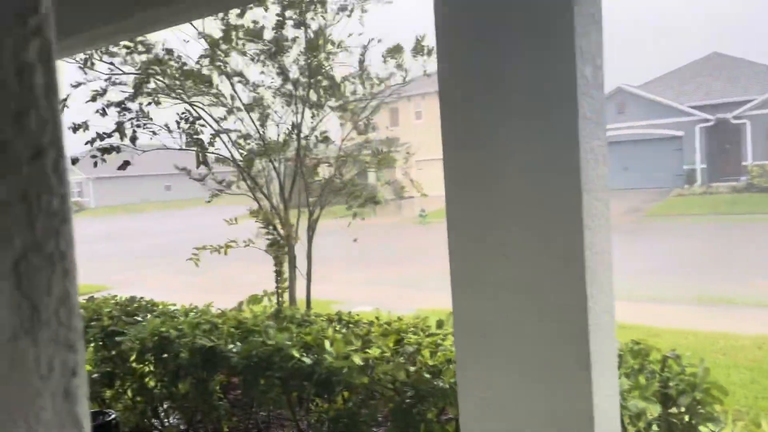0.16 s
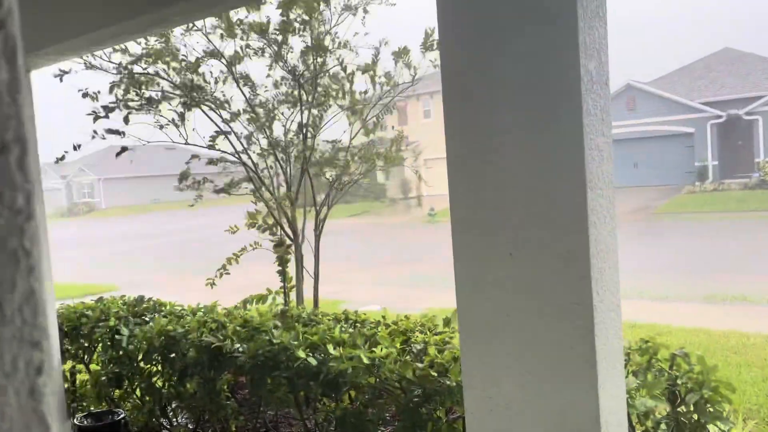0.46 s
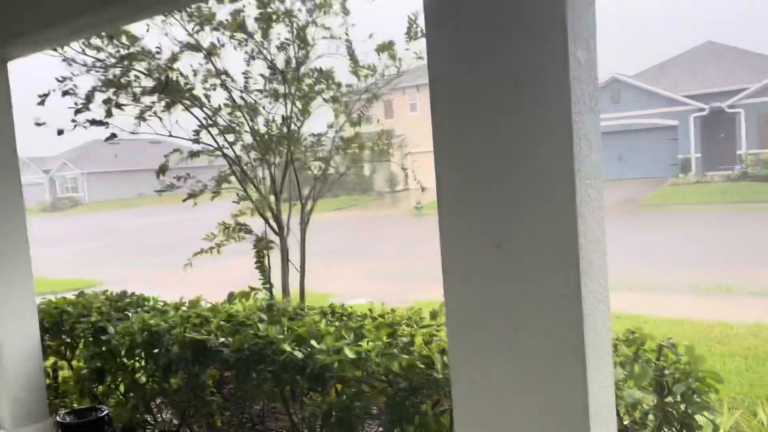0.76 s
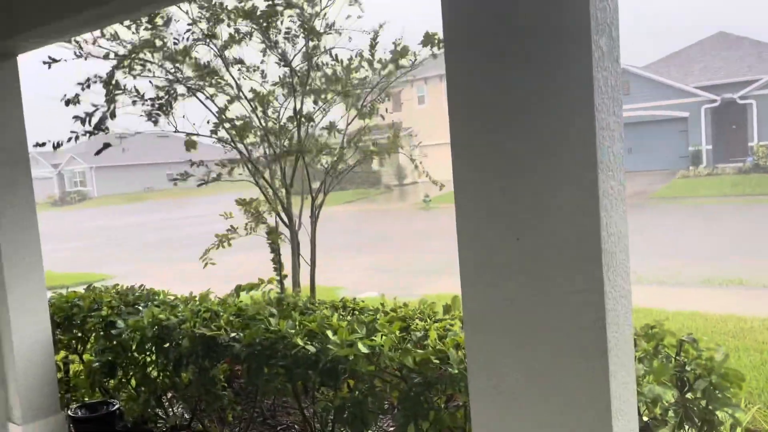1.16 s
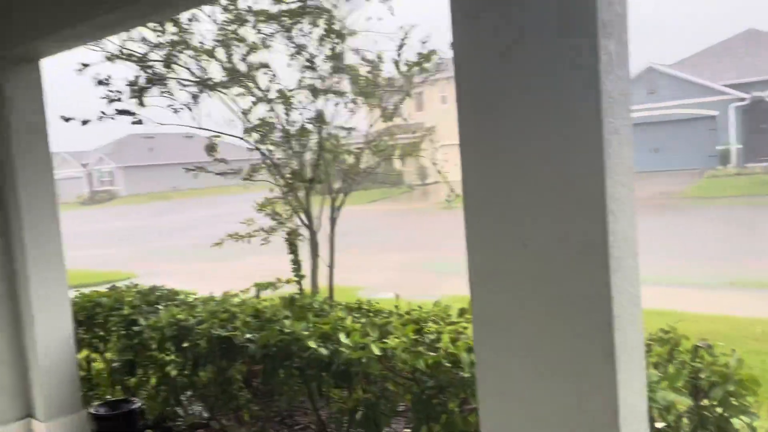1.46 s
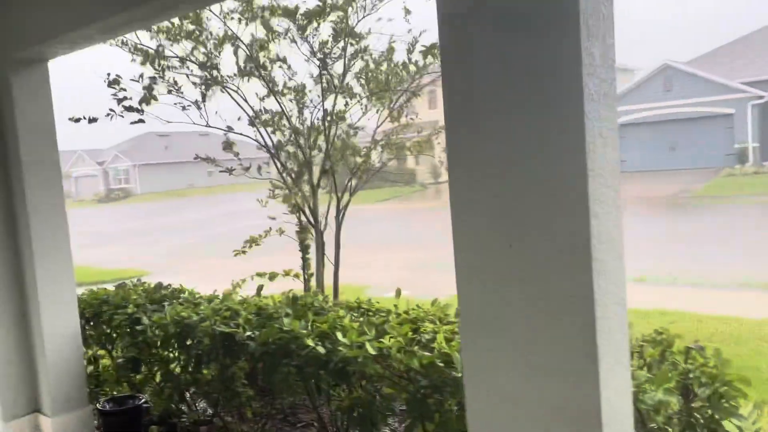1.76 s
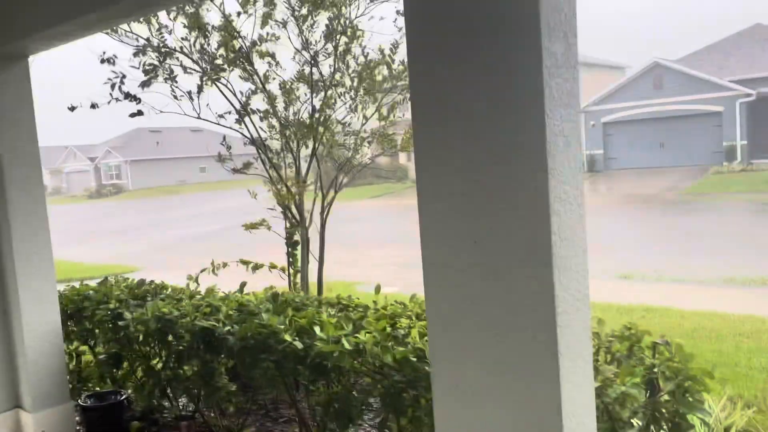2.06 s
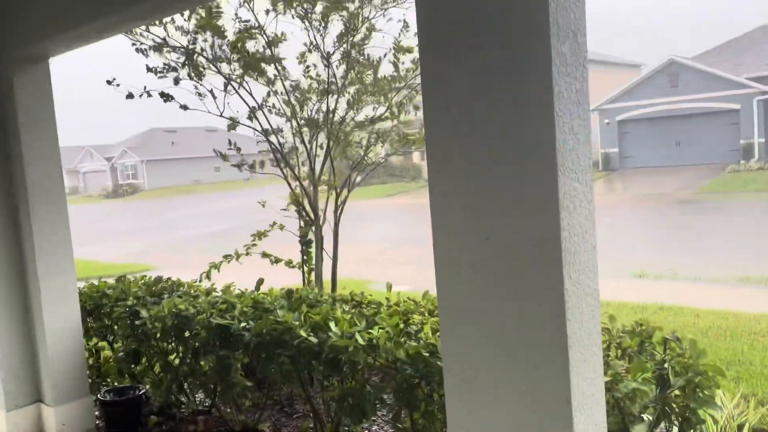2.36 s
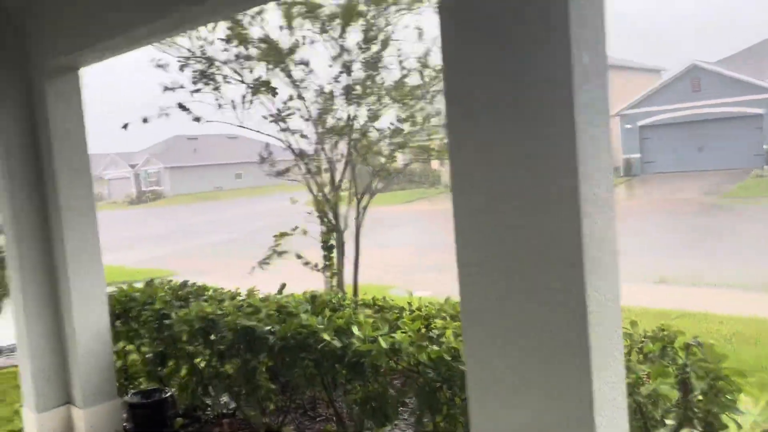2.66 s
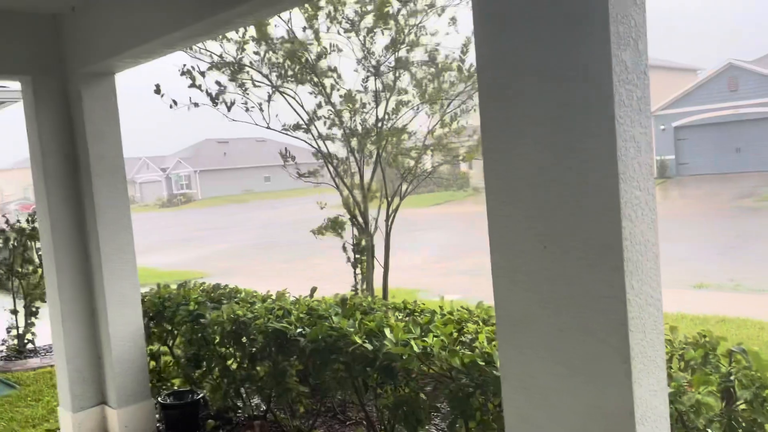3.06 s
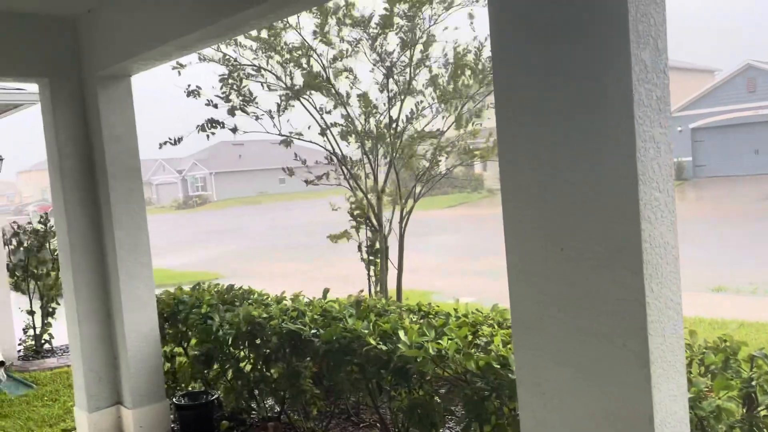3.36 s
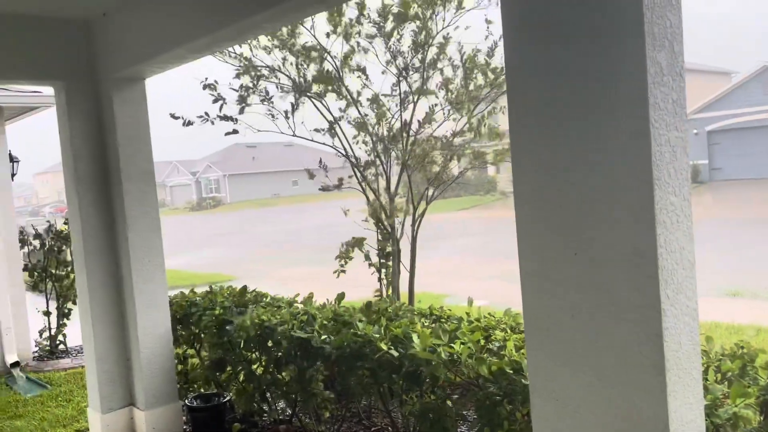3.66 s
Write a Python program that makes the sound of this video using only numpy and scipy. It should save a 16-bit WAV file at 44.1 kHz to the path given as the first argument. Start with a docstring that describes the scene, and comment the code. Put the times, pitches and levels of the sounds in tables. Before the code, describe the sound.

Heavy rain hisses steadily outside a porch while wind thumps the microphone and water splashes nearby.

```python
"""Storm from a covered porch

Heavy rain hisses on road, roofs and hedge (filtered noise with a patter of drops), and wind roars in the
trees (lower filtered noise). Lumps of run-off water splash on the paving and echo off a wall (noise bursts),
and heavy drops tick on something hard (short ringing modes). Turbulent air rumbles on the microphone ports,
and single eddies thump them (brief pressure swings of falling pitch).
"""
import sys
import numpy as np
from scipy import signal
from scipy.fft import rfft, irfft, next_fast_len
from scipy.io import wavfile
from scipy.ndimage import uniform_filter1d, map_coordinates

SR = 44100
rng = np.random.default_rng(int(sys.argv[2]) if len(sys.argv) > 2 else 0)


def bounce(signal):
    """Save signal as a 16-bit WAV file at the path given by the first command-line argument."""
    frames = np.transpose(np.atleast_2d(signal))
    limited = np.clip(frames, -1, 1)
    pcm = np.round(limited * 32767).astype(np.int16)
    wavfile.write(sys.argv[1], SR, pcm)


N = 167580

# Course of the rain hiss, of the wind roar and of the port rumble: t/s, level/dB
RAIN_LEVEL = [(0.0, -40), (0.66, -41), (1.0, -41.5), (1.39, -42), (1.87, -40.5), (2.5, -41.5), (3.23, -43),
              (3.6, -41.5), (3.8, -41.5)]
ROAR_LEVEL = [(0.0, -40.5), (0.17, -49), (0.68, -52.5), (1.05, -52), (1.15, -47), (1.43, -46.5),
              (1.65, -46), (1.82, -42.5), (2.1, -43), (2.56, -43), (2.77, -41), (3.15, -44.5), (3.42, -43),
              (3.65, -44), (3.8, -41.5)]
RUMBLE_LEVEL = [(0,-32),(.15,-38.5),(.24,-50.5),(.32,-28),(.55,-48.5),(.66,-46.5),(.78,-42.5),(.97,-51.5),(1.2,-45.5),(1.5,-48),(1.7,-43),(2.0,-50),(2.2,-45),(2.42,-39.5),(2.65,-44.5),(2.9,-35.5),(3.05,-42.5),(3.15,-43.5),(3.3,-49.5),(3.5,-44.5),(3.65,-43),(3.8,-41)]

# Relative spectra of the part alike at both ports (MID) and the part opposed (SIDE): f/Hz, level/dB per Hz
RAIN_MID = [(300, -42), (600, -3.5), (750, 2.5), (1200, 2), (2500, 1), (4500, -2.5), (5500, -5),
            (6500, -3.5), (7500, -9.5), (8200, -26), (8700, -82), (9100, -88), (9550, -16.5), (9900, -8.5),
            (12800, -4), (14300, -8.5), (15600, -22)]
RAIN_SIDE = [(300, -24), (600, -7), (750, 1.5), (1200, 0), (2100, 0), (2600, -0.5), (4500, -5), (5200, -5),
             (6600, -7), (9000, -1.5), (12300, -9.5), (13000, -57), (13500, -90)]
ROAR_MID = [(100, -5), (200, 1), (320, 4), (500, -0.5), (900, -6), (2000, -22.5), (4000, -75)]
ROAR_SIDE = [(100, -20), (200, -8), (320, -5.5), (600, -4), (900, -8), (2000, -10), (4000, -53)]
RUMBLE_MID = [(20, -49), (40, -7), (75, 1.5), (120, -6), (200, -16), (400, -37), (800, -84)]

# Run-off lumps: t/s, nominal level/dB, burst centre f/Hz, burst width/octaves, burst t60/s,
# low slosh level/dB and spray level/dB relative to the burst
SPLASHES = [(.436,-38,1500,0.76,0.21,-10,-10),(1.025,-28.5,1520,0.86,0.14,-9,-15),(1.053,-30.5,1310,1,0.095,-16,-12),(1.349,-48,2200,.4,0.11,-12,-13),(1.607,-31.5,1290,0.7,0.18,-4.5,-29),(1.888,-30,2180,0.58,0.078,-33,-8),(2.166,-25.5,1400,0.75,0.11,-5.5,-19),(2.408,-37.5,1960,0.93,0.38,-11,-7),(2.589,-39,1900,0.39,0.074,-4,-24),(2.614,-38,1080,0.6,0.51,-2,-33),(2.815,-39,1800,0.5,0.15,-11,-25),(2.84,-31,2200,0.5,0.13,-6.5,-20),(3.107,-33.5,1480,0.95,0.24,-1.1,-15),(3.68,-37.5,2120,0.36,0.15,-13,-21)]

# Heavy drops on something hard: t/s, level of each mode/dB, nominal f/Hz, t60/s
TICKS = [(.4305, -23, 2960, 0.013), (.68, -35, 12500, .003), (1.028, -30.5, 2120, .05),
         (1.055, -27, 1700, 0.014), (1.127, -27, 12700, 0.005), (1.864, -37, 12500, 0.0034),
         (1.892, -28.5, 2217, 0.06), (2.166, -26, 1217, 0.042), (2.188, -27, 1140, .04),
         (2.843, -34, 1930, 0.036), (2.856, -33, 1580, .04), (3.677, -34, 2190, 0.031)]
# Mode frequencies of a struck object: ratio to the nominal f
TICK_MODES = (.9, 1.0, 1.11)

# Eddies at the ports: t/s, nominal peak level/dB, nominal f/Hz, nominal length/cycles,
# sharp edge level/dB relative to the swing
EDDIES = [(0.016,-5.5,332,0.98,-28),(.022,-13.5,170,1.1,-16),(.038,-20,194,2.2,-6.5),(.055,-15.5,218,2.1,-20),(0.068,-22,304,3.2,-20),(0.08,-29,150,0.96,-7),(0.096,-27,120,1.1,-14),(.116,-19,326,1.7,-20),(0.129,-26,108,1.1,-15),(0.142,-26,109,0.79,-19),(0.3,-33,98,2.9,-18),(.330,-11.5,180,1.28,0),(.342,-21.5,110,1.0,-12),(.382,-31,112,1.2,1.5),(.407,-17.5,232,0.7,-7.5),(.417,-29,223,2.2,-6),(.423,-26.5,497,1.9,-6),(0.44,-32,120,1.1,-5),(.496,-30,160,0.36,-7),(0.878,-30,116,2.1,-9),(1.176,-34,100,1.4,-7),(1.222,-32.5,175,1.2,-5.5),(1.26,-33,129,1.6,-1),(1.365,-35,128,0.83,-3),(1.41,-33.5,109,0.79,-14),(1.679,-37,147,1.3,-13),(2.106,-32,171,1.1,-17),(2.279,-33,167,0.95,-13),(2.3,-26,120,1.7,-21),(2.37,-26,130,1.2,-31),(2.395,-24.5,126,0.67,-27),(2.452,-31.5,118,2.6,-10),(2.478,-24,147,1,-11),(2.569,-29,105,0.78,-15),(2.716,-24.5,139,0.83,-12),(2.75,-21,180,0.8,-19),(2.762,-30,90,1.3,-22),(2.844,-28,150,0.64,-2),(2.903,-41,129,0.42,-10),(2.923,-33.5,113,1.5,-1),(2.946,-29.5,118,0.89,-12),(3.678,-39,123,5,-11)]

# Balance between the ports: f/Hz, left over right level/dB
BALANCE = [(150, 0.2), (330, 1), (800, 1.9), (1800, 0), (2800, 0.2), (4500, 2.5), (6500, 2.7), (7800, -4)]

DROPS_DB, DROP_SPREAD_DB = -11.5, 1  # near drops against the hiss; mean of their exponential size spread
RUMBLE_SIDE_DB, LUMP_DB = -13, 1.5  # opposed part of the rumble; depth factor of its lumps

SPLASH_RISE_S, ECHO_S, ECHO_DB, GRAIN_DB = .002, .027, -8, 2.2
SLOSH_HZ, SLOSH_RISE_S, SLOSH_T60_S = 312, 0.016, 0.38
TAIL_RATIO, TAIL_DB, TAIL_LONGER = 0.65, -5, 2.67  # tail pitch, level and decay time against the burst

SAG, EDGE_RATIO = 0.42, 2.74  # fall of eddy pitch; edge over swing pitch, and snap over edge pitch
SNAP_DB, EDDY_SIDE_DB = -9.5, -12.5  # snap under the edge, before the edge level counts again; opposed part
RAG_DB, RAG_HZ, RAG_S = -14.5, 474, 0.012  # ragged noise: level under the edge, centre, half length

TICK_PHASE_SPREAD, EDDY_PHASE_SPREAD = .3, .3  # share of a half turn by which the parts start apart
LOW_CUT_HZ, TOP_HZ = 34, 15700


def amp(db):
    """Logarithmic level: decibels become an amplitude ratio."""
    return 10 ** (np.asarray(db) / 20)


def unit(x):
    """Normalisation: scale a signal to an rms of 1."""
    return x / np.sqrt(np.mean(x ** 2) + 1e-20)


def along(points, hz):
    """Spectral interpolation: read a table of values along a logarithmic frequency axis."""
    f, value = np.transpose(points)
    return np.interp(np.log(hz + 1), np.log(f + 1), value)


def curve(rows):
    """Linear interpolation in time: one table value per sample."""
    s, value = np.transpose(rows)
    return np.interp(np.arange(N) / SR, s, value)


def wobble(rate):
    """Band-limited fluctuation: a smooth random curve, rate knots a second, without slow drift."""
    knots = rng.standard_normal(400)
    fast_knots = knots - uniform_filter1d(knots, size=5)
    return map_coordinates(fast_knots, [np.arange(N) * rate / SR])


def filtered(x, response):
    """Linear filtering: multiply the spectrum by a response of frequency."""
    m = next_fast_len(x.shape[-1] + 8192)
    spectrum = rfft(x, m) * response(np.fft.rfftfreq(m, 1 / SR))
    return irfft(spectrum, m)[..., :x.shape[-1]]


def patchy(patchy_db):
    """Modulated noise: two white noises share random patches of gain in time and frequency."""
    noises = signal.stft(rng.standard_normal((2, N)), nperseg=512)[2]
    field = rng.standard_normal(noises.shape[1:])
    field = uniform_filter1d(field, size=4, axis=0)
    field = uniform_filter1d(field, size=5, axis=1)
    field = field - uniform_filter1d(field, size=40, axis=1)  # no slow drift
    return signal.istft(noises * amp(patchy_db * unit(field)), nperseg=512)[1][:, :N]


def stereo(pair, mid_db, side_db):
    """Sum and difference: colour the alike and the opposed part; the alike part has rms 1."""
    mid, side = filtered(pair, lambda hz: amp([along(mid_db, hz), along(side_db, hz)]))
    return np.array([mid + side, mid - side]) / np.sqrt(np.mean(mid ** 2))


def rain():
    """Superposition of many impacts: far rain merges into noise, nearer drops patter as brief clicks on it."""
    count = 3000
    at = rng.integers(0, N, count)
    size = amp(DROP_SPREAD_DB * rng.exponential(size=count)) * rng.standard_normal((2, count))
    impulses = np.array([np.bincount(at, s, N) for s in size])
    t = np.arange(90) / SR
    click = rng.standard_normal(90) * amp(-60 * t / 0.00036)  # t60 of 0.36 ms
    drops = signal.fftconvolve(impulses, [click], axes=1)[:, :N]
    pair = patchy(patchy_db=1.85) + amp(DROPS_DB) * unit(drops)
    level_db = curve(RAIN_LEVEL) + .5 * wobble(18) + 0.76 * wobble(29.76)
    return amp(level_db) * stereo(pair, RAIN_MID, RAIN_SIDE)


def roar():
    """Aerodynamic noise: wind in trees and round the pillars gives a low, fluctuating broadband roar."""
    level_db = curve(ROAR_LEVEL) + 0.21 * wobble(7.77) + 0.85 * wobble(20)
    return amp(level_db) * stereo(patchy(patchy_db=1.35), ROAR_MID, ROAR_SIDE)


def buffet():
    """Turbulent pressure noise: air moving on the ports rumbles in lumps, mostly alike at both ports."""
    side_db = [(hz, db + RUMBLE_SIDE_DB) for hz, db in RUMBLE_MID]
    lumps = unit(amp(LUMP_DB * wobble(28.02)))
    rumble = stereo(rng.standard_normal((2, N)), RUMBLE_MID, side_db)
    return amp(curve(RUMBLE_LEVEL)) * lumps * rumble


def fall(t, rise, t60):
    """Exponential decay: an envelope that starts at t = 0 with a rise constant and falls 60 dB in t60."""
    since = np.abs(t)
    return (t > 0) * (1 - np.exp(-since / rise)) * amp(-60 * since / t60)


def splashes():
    """Impact of water: a grainy burst with spray, its wall echo, a duller tail and a low slosh."""
    length = 16000
    out, t = np.zeros((2, N + length)), np.arange(length) / SR

    def band(hz, octaves):
        """Band-pass noise: a Gaussian response on the octave axis, independent at the two ports."""
        noise = rng.standard_normal((2, length))
        return unit(filtered(noise, lambda f: np.exp(-.5 * (np.log2((f + 1) / hz) / octaves) ** 2)))

    for s, db, hz, octaves, t60, slosh_db, spray_db in SPLASHES:
        grain = amp(GRAIN_DB * np.interp(t * 400, np.arange(160), rng.standard_normal(160)))
        direct = fall(t, SPLASH_RISE_S, t60)
        echo = amp(ECHO_DB) * fall(t - ECHO_S, SPLASH_RISE_S, t60)
        shape = grain * np.hypot(direct, echo)  # the powers of direct sound and echo add
        burst = shape * (band(hz, octaves) + amp(spray_db) * band(5600, 0.35))
        tail_shape = fall(t, SLOSH_RISE_S / 2, TAIL_LONGER * t60)
        tail = amp(TAIL_DB) * tail_shape * band(TAIL_RATIO * hz, 0.64 * octaves)
        alike, opposed = band(SLOSH_HZ, 0.58)
        low = alike + 0.51 * opposed * [[1], [-1]]
        slosh = amp(slosh_db) * fall(t, SLOSH_RISE_S, SLOSH_T60_S) * low
        start = round(s * SR)
        out[:, start:start + length] += amp(db) * (burst + tail + slosh)
    return out[:, :N]


def ticks():
    """Modal ringing: single heavy drops strike something hard close by, and three damped modes sound."""
    out = np.zeros((2, N))
    phases = TICK_PHASE_SPREAD * rng.uniform(-np.pi, np.pi, (len(TICKS), 3, 2, 1))
    for (s, db, hz, t60), phase in zip(TICKS, phases):
        t = np.clip(np.arange(N) / SR - s, 0, None)
        ring = sum(np.sin(2 * np.pi * k * hz * t + p) for k, p in zip(TICK_MODES, phase))
        rise = 1 - np.exp(-t / (0.054 * t60))
        out += amp(db - 60 * t / t60) * rise * ring
    return out


def eddies():
    """Transient pressure: each eddy swings with falling pitch, with an edge, snap and ragged noise at its peak."""
    half = 2000
    length = 2 * half
    out, t = np.zeros((2, N + length)), np.arange(-half, half) / SR
    noise = rng.standard_normal(N + length)
    noise = unit(filtered(noise, lambda f: np.exp(-(np.log2((f + 1) / RAG_HZ) / 0.7) ** 2)))
    draws = rng.uniform(-np.pi, np.pi, (len(EDDIES), 4))
    for (s, db, hz, cycles, edge_db), draw in zip(EDDIES, draws):
        u = t * hz / cycles  # time in eddy lengths

        def swing(k, phase):
            """Gaussian wave packet: k times the nominal pitch, sagging through its peak."""
            turns = k * hz * t * (1 - SAG * np.tanh(u))
            return np.exp(-2.2 * (k * u) ** 2) * np.cos(2 * np.pi * turns + phase)

        def edge(phase):
            """Steepening: a sharper packet and a sharper snap, which grows faster with edge level."""
            snap = amp(SNAP_DB + edge_db) * swing(EDGE_RATIO ** 2, phase)
            return amp(edge_db) * (swing(EDGE_RATIO, phase) + snap)

        start = round(s * SR)
        rag = amp(RAG_DB + edge_db) * np.exp(-(t / RAG_S) ** 2) * noise[start:start + length]
        edge_phase = EDDY_PHASE_SPREAD * draw[1]
        mid = swing(0.95, EDDY_PHASE_SPREAD * draw[0]) + edge(edge_phase) + rag
        side = amp(EDDY_SIDE_DB) * swing(0.96, draw[2]) + 0.47 * edge(edge_phase + 0.56 * draw[3])
        out[:, start:start + length] += amp(db) * np.array([mid + side, mid - side])
    return out[:, half:N + half]


def scene():
    """Linear superposition: the pressures of all sources add at the two ports."""
    return rain() + roar() + buffet() + splashes() + ticks() + eddies()


def record(dry):
    """Frequency response: balance of the ports by frequency, a deep bass cut and a sharp upper band limit."""
    def response(hz):
        """Transfer function: gain of the left and right port against frequency."""
        left_over_right = along(BALANCE, hz) * (hz < BALANCE[-1][0])  # level balance above the table
        bass_cut = 1 / np.sqrt(1 + (LOW_CUT_HZ / (hz + 1)) ** 4)
        return amp(left_over_right * [[.5], [-.5]]) * (hz < TOP_HZ) * bass_cut

    return filtered(dry, response)


dry = scene()
out = record(dry)
bounce(out)
```